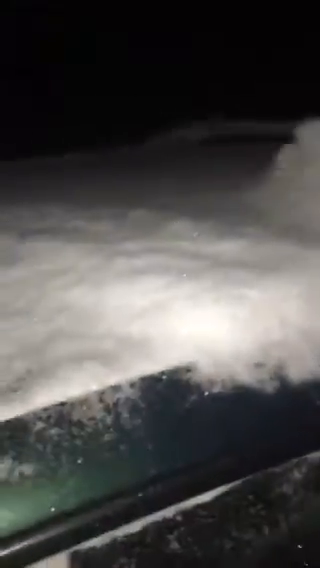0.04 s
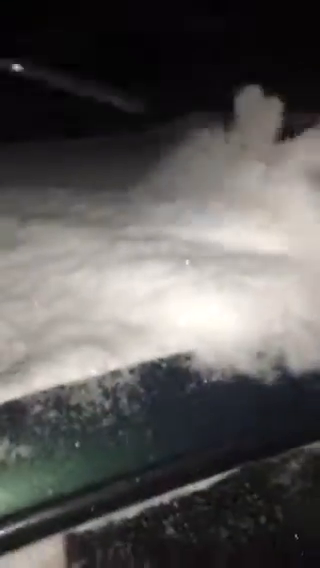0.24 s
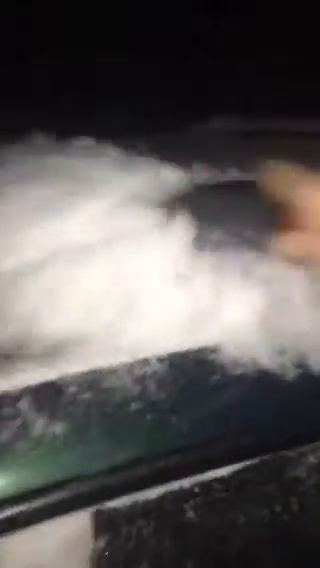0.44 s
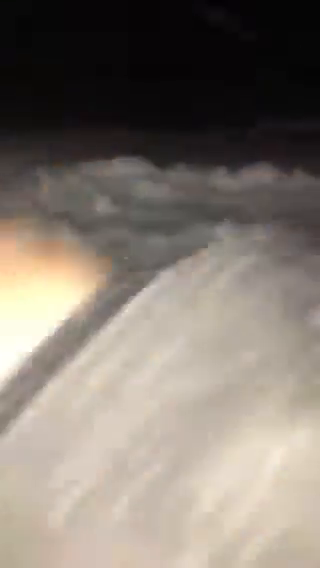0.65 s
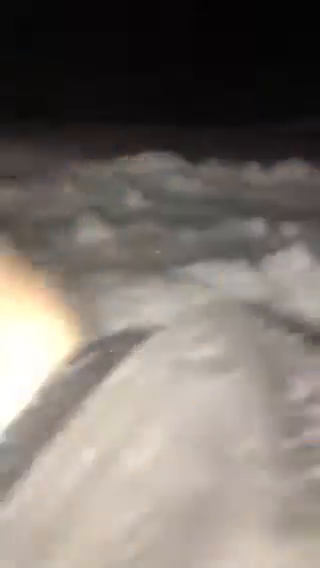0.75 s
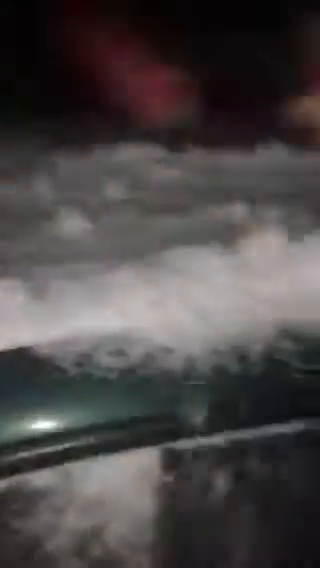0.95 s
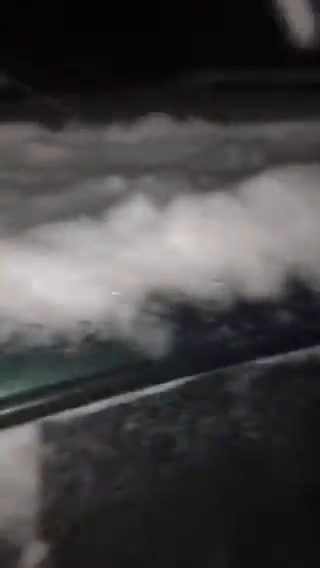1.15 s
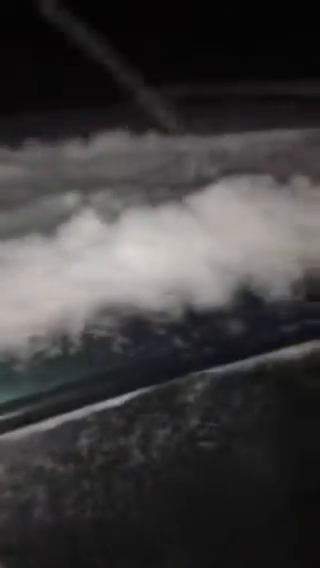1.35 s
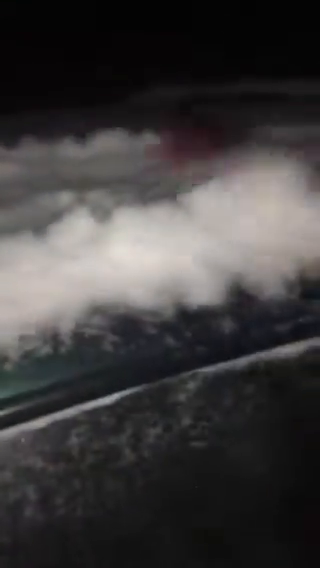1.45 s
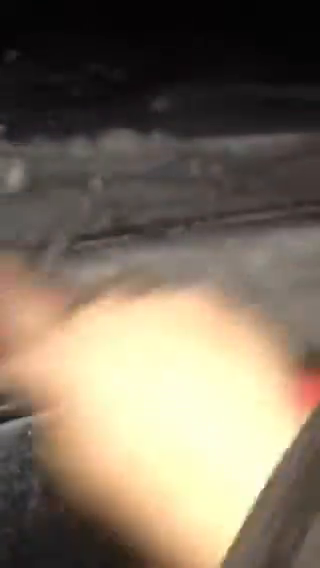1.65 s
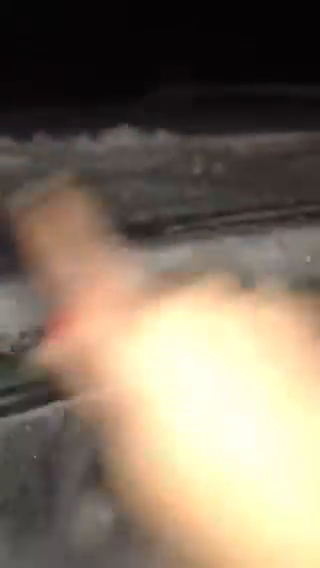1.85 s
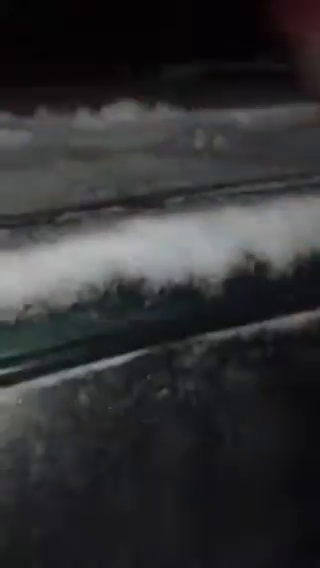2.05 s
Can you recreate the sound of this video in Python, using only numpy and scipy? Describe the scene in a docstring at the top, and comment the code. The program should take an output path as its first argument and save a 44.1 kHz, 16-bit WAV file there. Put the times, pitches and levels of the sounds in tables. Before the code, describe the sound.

Snow crunches and bristles hiss on glass as a car is brushed close to the microphone, outdoors. Low wind rumble and dull puffs cover the first long stroke; a few ice crumbs tick, then a shorter, harder stroke follows.

```python
"""Packed snow crunches and bristles hiss on glass as a hand brush sweeps a car, close by, at night.
One long stroke is followed by a shorter, harder one. Clumps break away, the stiff brush head rings
as it catches, loose powder sifts down and ice crumbs tick against the car.
Moving air buffets the microphone with a low rumble and dull puffs."""
import sys
import numpy as np
from scipy import signal
from scipy.fft import rfft, irfft, next_fast_len
from scipy.io import wavfile
from scipy.ndimage import uniform_filter1d

SR = 44100
rng = np.random.default_rng(int(sys.argv[2]) if len(sys.argv) > 2 else 0)


def unload_wav(signal):
    """Save mono or channel-first audio to the path in sys.argv[1] as 16-bit WAV at rate SR, clipped to [-1, 1]."""
    wavfile.write(
        sys.argv[1],
        SR,
        np.round(np.clip(np.atleast_2d(signal).T, -1, 1) * 32767).astype(np.int16),
    )


N = 92610
T = np.arange(N) / SR


def from_db(db):
    """Turn decibels into a number to multiply by."""
    return 10 ** (np.asarray(db) / 20)


def rms_one(x):
    """Scale a sound so its average strength (rms) is 1."""
    return x / np.sqrt(np.mean(x ** 2) + 1e-20)


def level(rows):
    """Join (seconds, dB) points into a volume curve that fades quickly outside them."""
    times, db = np.transpose(rows)
    outside_s = np.maximum(times[0] - T, 0) + np.maximum(T - times[-1], 0)
    return from_db(np.interp(T, times, db) - 120 * outside_s)


def shaped(x, db_at):
    """Filter a sound by a function that gives dB for each frequency."""
    size = next_fast_len(N + SR // 10, True)
    hz = np.maximum(np.fft.rfftfreq(size, 1 / SR), 1)
    gain = from_db(np.maximum(db_at(hz), -200))
    return irfft(rfft(x, size) * gain, size)[:N]


def coloured(x, colour):
    """Set a sound's balance of low and high from (Hz, dB) points; strength 1."""
    points, db = np.transpose(colour)
    return rms_one(shaped(x, lambda hz: np.interp(np.log(hz), np.log(points), db)))


def bumps(x, rows):
    """Boost or soften narrow ranges of pitch."""
    return shaped(x, lambda hz: sum(
        db * np.exp(-(2 * (hz - centre) / width) ** 2) for centre, db, width in rows))


def band(x, hz, spread):
    """Keep the pitches from hz / spread to hz * spread; strength 1."""
    edges = [hz / spread, min(hz * spread, .45 * SR)]
    return rms_one(signal.sosfilt(signal.butter(2, edges, "band", fs=SR, output="sos"), x))


def flicker(depth_db, rate_hz):
    """A volume that wanders up and down at random."""
    wander = shaped(rng.standard_normal(N), lambda hz: -20 * np.log10(1 + (hz / rate_hz) ** 2))
    return from_db(depth_db * rms_one(wander))


def grains(per_s, spread_db):
    """Tiny random impacts of uneven size; strength 1."""
    sizes = from_db(spread_db * np.minimum(rng.exponential(1, N), 4)) * rng.choice([-1, 1], N)
    return rms_one(sizes * (rng.random(N) < per_s / SR))


def swells(rows, per_s, spread_db, spread):
    """Short bursts of grains that rise and fall, each around its own pitch."""
    out = np.zeros(N)
    for middle_s, db, half_s, hz in rows:
        volume = from_db(db) * np.exp(-.5 * ((T - middle_s) / half_s) ** 2)
        out += volume * band(grains(per_s, spread_db), hz, spread)
    return out


# Snow pushed by the long stroke and the hard one. Each row: time in seconds, level in dB.
LONG_PUSH = [(0, -53), (.10, -49), (.14, -54.5), (.40, -55.5), (.58, -54.5), (.68, -49.5), (.742, -48),
             (.765, -79)]
HARD_PUSH = [(1.405, -69), (1.44, -49), (1.485, -47.5), (1.54, -42.5), (1.58, -46.5), (1.68, -52.5),
             (1.735, -43.5), (1.795, -50), (1.845, -68)]
# The tone of the crunch. Each row: frequency in Hz, boost or cut in dB.
SNOW_COLOUR = [(200, 8), (450, 2), (1000, 4), (1600, 0.5), (2200, 0.5), (3000, -7), (4200, -8),
               (6500, -4.5), (15000, -50)]
def snow():
    """Packed snow crumbles unevenly ahead of the brush."""
    crunch = coloured(grains(per_s=5000, spread_db=2.5), SNOW_COLOUR)
    return crunch * flicker(depth_db=1, rate_hz=36) * (level(LONG_PUSH) + level(HARD_PUSH))


# Bristles on the glass in each stroke. Each row: time in seconds, level in dB.
LONG_STROKE = [(0, -60.5), (.09, -60), (.14, -63), (.25, -57), (.46, -52.5), (.55, -57), (.63, -51.5),
               (.745, -78), (.76, -78)]
HARD_STROKE = [(1.40, -74), (1.435, -50), (1.49, -72), (1.525, -45.5), (1.56, -46), (1.61, -44.5),
               (1.70, -47), (1.80, -49), (1.845, -71)]
# The tone of their hiss. Each row: frequency in Hz, boost or cut in dB.
BRISTLE_COLOUR = [(300, 9), (700, 1), (2000, 4.5), (3200, -3), (4500, -1.5), (6300, 0), (8000, 3.5),
                  (9300, 2.5), (11000, -3), (15500, -11)]
def bristles():
    """Bristles stick and slip on frosted glass; pressed hard, they bend and sound duller."""
    hiss = coloured(grains(per_s=14000, spread_db=1.5), BRISTLE_COLOUR)
    hiss *= flicker(depth_db=.75, rate_hz=40)
    bent = shaped(hiss, lambda hz: -16 * (hz / 12800) ** 4)  # 16 dB quieter at 12800 Hz
    return hiss * level(LONG_STROKE) + bent * level(HARD_STROKE)


# Powder spraying and sifting down. Each row: time in seconds, level in dB.
POWDER_FALL = [(0, -66), (.09, -57), (.15, -69), (.54, -61), (.70, -47), (.745, -46), (.76, -60.5),
               (.88, -59), (.96, -55.5), (1.10, -58.5), (1.40, -64), (1.49, -55.5), (1.54, -43.5),
               (1.62, -48.5), (1.79, -47), (1.85, -63.5), (2.03, -58.5), (2.1, -59.5)]
# The tone of the powder. Each row: frequency in Hz, boost or cut in dB.
POWDER_COLOUR = [(500, -11), (2000, 2), (4000, -1.5), (6500, -1.5), (9000, 0.5), (11000, 1.5), (13000, 0),
                 (15500, -4.5)]
def powder():
    """Loose crystals patter down as a fine, bright hiss."""
    return coloured(grains(per_s=18000, spread_db=1), POWDER_COLOUR) * level(POWDER_FALL)


# Moving air. Each row: time in seconds, level in dB.
AIR_FLOW = [(0, -53.5), (.21, -45.5), (.26, -33), (.34, -27), (.43, -40), (.53, -37), (.60, -27),
            (.71, -44.5), (.755, -36), (.84, -37), (.88, -50), (1.05, -48), (1.40, -55), (1.49, -55),
            (1.55, -49), (1.61, -47), (1.74, -40.5), (1.79, -49.5), (1.84, -40), (1.92, -59.5),
            (2.1, -49.5)]
# Its deep tone. Each row: frequency in Hz, boost or cut in dB.
AIR_COLOUR = [(20, -27), (35, -13.5), (50, 6.5), (72, 1), (110, -5), (160, -11), (250, -21.5), (400, -29),
              (800, -57)]
def rumble():
    """Air stirred by the arm rumbles in lumps across the microphone."""
    noise = coloured(rng.standard_normal(N), AIR_COLOUR)
    power = uniform_filter1d(np.abs(signal.hilbert(noise)) ** 2, int(.089 * SR))
    steady = rms_one(noise / np.sqrt(np.maximum(power, 0) + 1e-6))  # evens out chance swells
    return steady * level(AIR_FLOW) * flicker(depth_db=.7, rate_hz=16)


# The tone of the background. Each row: frequency in Hz, boost or cut in dB.
OUTDOOR_COLOUR = [(20, -7), (70, 11), (200, -3.5), (400, -3.5), (900, -6), (2000, -17.5), (3200, -19),
                  (8000, -12.5), (15000, -29)]
def outdoors():
    """A faint, steady hush lies under everything."""
    return from_db(-61.5) * coloured(rng.standard_normal(N), OUTDOOR_COLOUR)


# Snow clumps. Each row: middle in seconds, level in dB, half length in seconds, pitch in Hz.
CLUMPS = [(.002, -49, 0.005, 1020), (.033, -52, 0.014, 600), (.092, -53.5, 0.0076, 1920),
          (.802, -49.5, 0.021, 1200), (1.367, -57, 0.0073, 1470), (1.546, -45.5, 0.014, 1110)]
def clumps():
    """Clumps of snow break away with short crunches."""
    return swells(CLUMPS, per_s=4000, spread_db=.5, spread=1.82)


# Brush rings. Each row: middle in seconds, level in dB, half length in seconds, pitch in Hz.
BRUSH_RINGS = [(0.068, -44.5, 0.006, 1085), (0.084, -50, 0.011, 457), (.06, -63.5, 0.063, 3430),
               (0.712, -55, 0.022, 2200), (0.812, -60, 0.019, 6070), (1.455, -52.5, 0.021, 2100),
               (1.55, -47, 0.021, 9440), (1.7, -54, 0.026, 1600)]
def brush_rings():
    """The stiff brush head rings briefly as it catches."""
    return swells(BRUSH_RINGS, per_s=9000, spread_db=1.5, spread=1.1)


# Air hitting the microphone. Each row: time in seconds, peak of the push in dB, brightness in Hz.
PUFFS = [(0.157, -42.5, 91), (0.217, -39, 220), (.241, -28.5, 203), (0.258, -30, 190), (.306, -21.5, 230),
         (.317, -23, 238), (.338, -17, 260), (0.371, -16.5, 156), (0.427, -37, 214), (0.467, -29.5, 236),
         (0.529, -31, 295), (0.566, -23.5, 210), (.580, -24, 185), (0.606, -26.5, 279), (0.652, -29.5, 214),
         (0.674, -30.5, 186), (0.74, -27.5, 75.6), (0.753, -25.5, 228), (.809, -20, 220), (.857, -40, 304),
         (.906, -28, 206), (1.03, -44.5, 99), (1.123, -44, 131), (1.206, -38, 170), (1.486, -36.5, 112),
         (1.602, -27.5, 56), (1.639, -29.5, 164), (1.677, -31, 195), (1.728, -29.5, 60),
         (1.822, -28.5, 135), (1.978, -42, 60)]
def puffs():
    """Each puff is one rounded push of air with a short trail of swirls."""
    swirl_s, swirl_share = .008, .65
    out = np.zeros(N)
    for s, db, bright_hz in PUFFS:
        # The microphone's opening leaks the slowest part away.
        leak = np.vstack([signal.butter(3, 45, "high", fs=SR, output="sos"),
                          signal.butter(1, .21 * bright_hz, "high", fs=SR, output="sos")])

        def muffled(x):
            dull = shaped(x, lambda hz: -13.5 * (hz / bright_hz) ** 1.26)
            return rms_one(signal.sosfilt(leak, dull))

        push = muffled(1. * (np.arange(N) == int(s * SR)))
        trail = np.exp(-.5 * ((T - s) / swirl_s - .5) ** 2)
        swirls = muffled(trail * rng.standard_normal(N))
        out += from_db(db) * (push + swirl_share * swirls) / np.abs(push).max()
    return out


# Brush bites. Each row: middle in seconds, level in dB, half length in seconds, pitch in Hz.
BITES = [(.735, -53.5, 0.01, 3330), (1.782, -47, 0.024, 3060)]
def bites():
    """The brush bites down to the glass as each stroke ends."""
    return swells(BITES, per_s=7100, spread_db=6, spread=1.42)


# Ice crumbs. Each row: start in seconds, level in dB, pitch in Hz.
ICE_TICKS = [(0.766, -53, 9500), (.8138, -41.5, 10900), (.839, -47, 7940), (0.918, -47.5, 3100)]
def ice_ticks():
    """Each ice crumb hits the car with a very short, bright tick."""
    fade_s = .00095
    out = np.zeros(N)
    for start, db, hz in ICE_TICKS:
        volume = from_db(db) * (T >= start) * np.exp(-np.abs(T - start) / fade_s)
        out += volume * band(rng.standard_normal(N), hz, spread=1.25)
    return out


# Pitches the hollow brush head changes. Each row: centre in Hz, boost or cut in dB, width in Hz.
BRUSH_BODY = [(974, -0.5, 300), (1600, 1, 100), (2320, 0.5, 280), (3460, 1.5, 410), (3980, 0, 300),
              (4540, 3, 480), (5290, 0.5, 270), (6100, 1, 240)]
def scene():
    """The brushing, coloured by the hollow head, mixes with powder, air and ice."""
    brushing = bumps(snow() + bristles() + clumps() + brush_rings() + bites(), BRUSH_BODY)
    return (brushing + powder() + rumble() + outdoors() + puffs() + ice_ticks())[None]


# Pitches the microphone changes. Each row: centre in Hz, boost or cut in dB, width in Hz.
MICROPHONE = [(2190, -1.5, 850), (2844, -3, 600), (4790, -4, 550), (7660, -2, 1050), (9700, 1, 1400),
              (10350, -4, 1100)]
def record(dry):
    """The microphone colours the sound, then the very highest pitches are cut away."""
    cutoff_hz = 15750
    heard = bumps(dry[0], MICROPHONE)
    return shaped(heard, lambda hz: -np.clip((hz - cutoff_hz) * .3, 0, 90))[None]


dry = scene()
out = record(dry)
unload_wav(out)
```